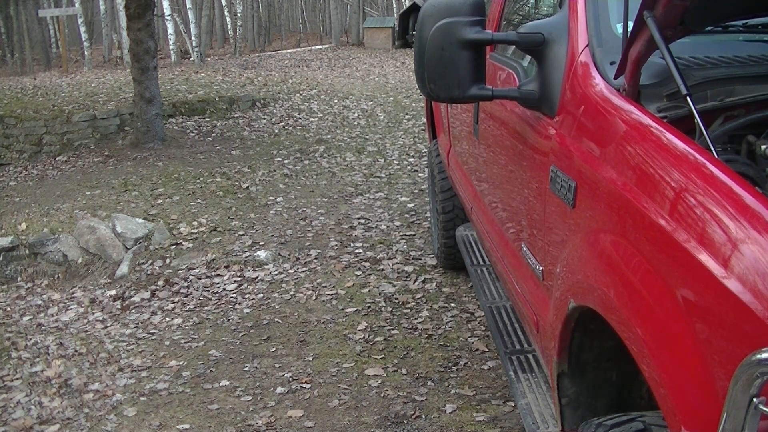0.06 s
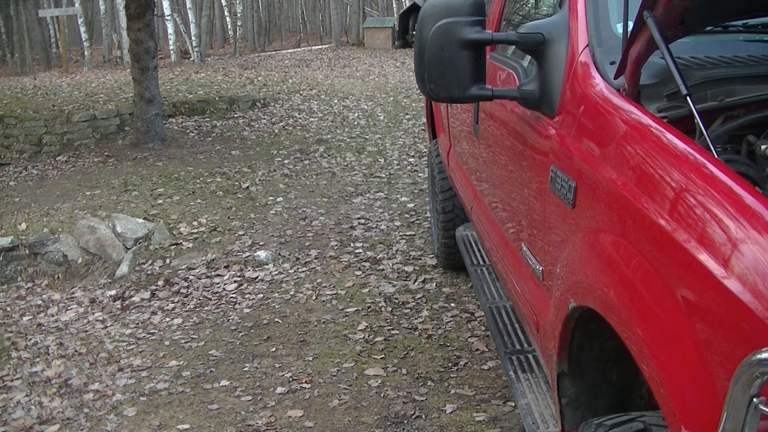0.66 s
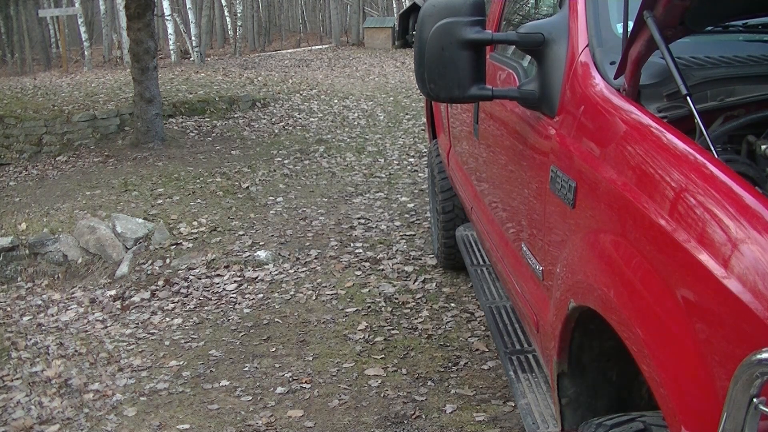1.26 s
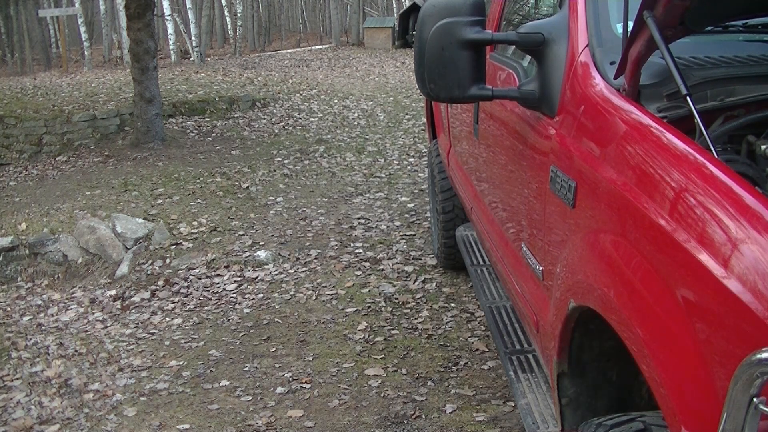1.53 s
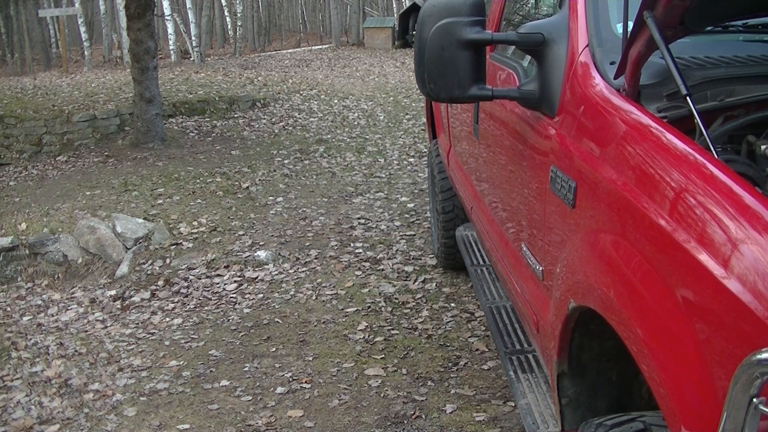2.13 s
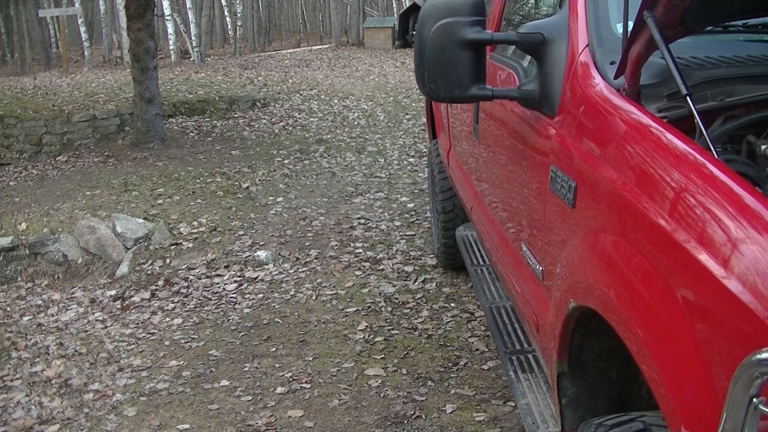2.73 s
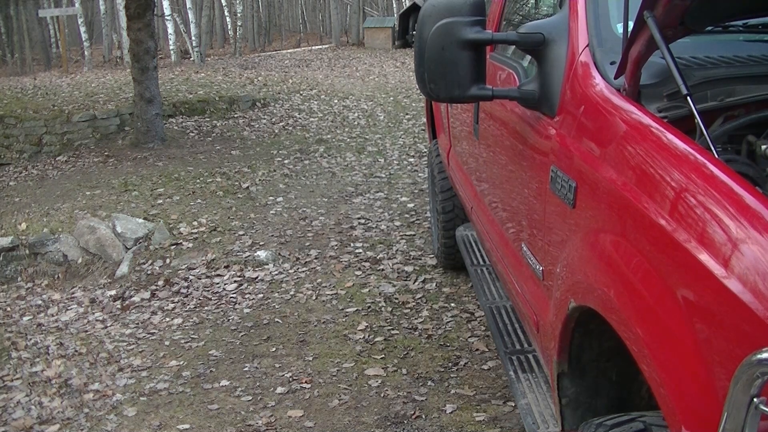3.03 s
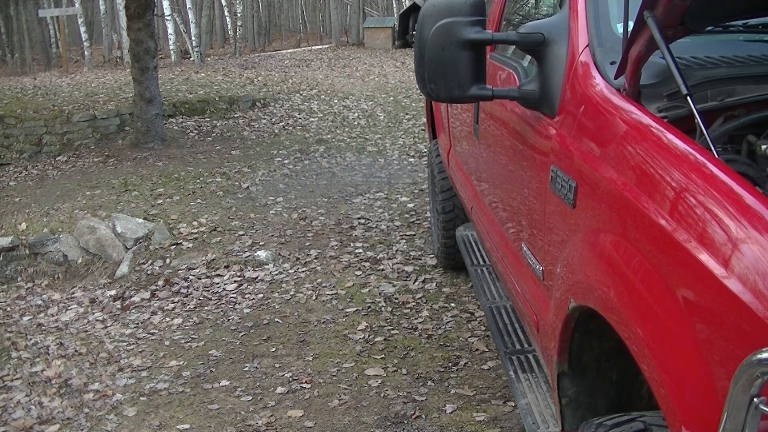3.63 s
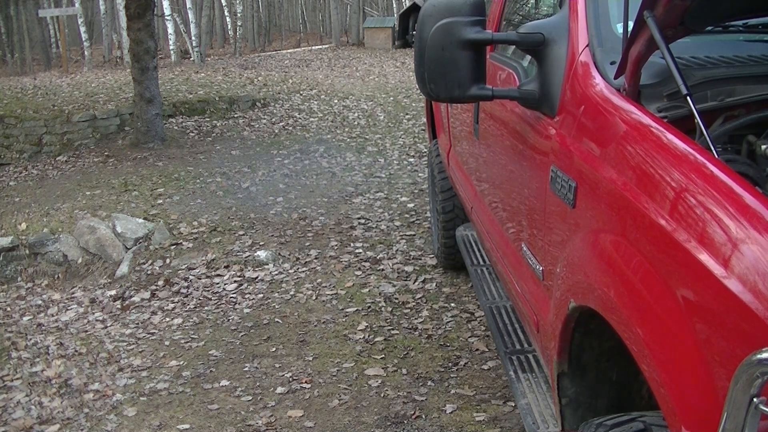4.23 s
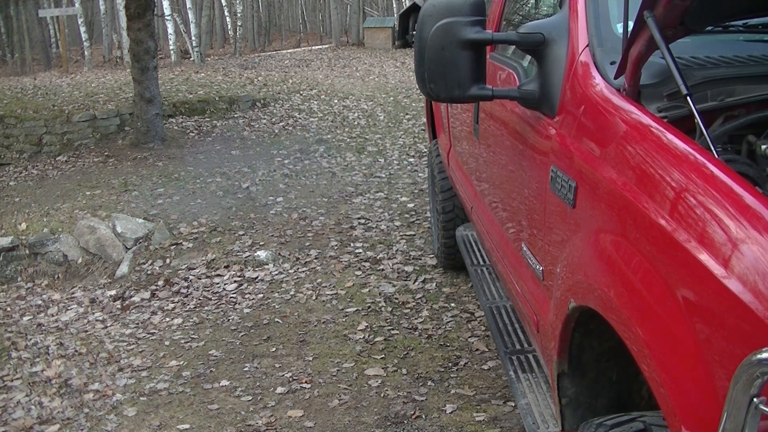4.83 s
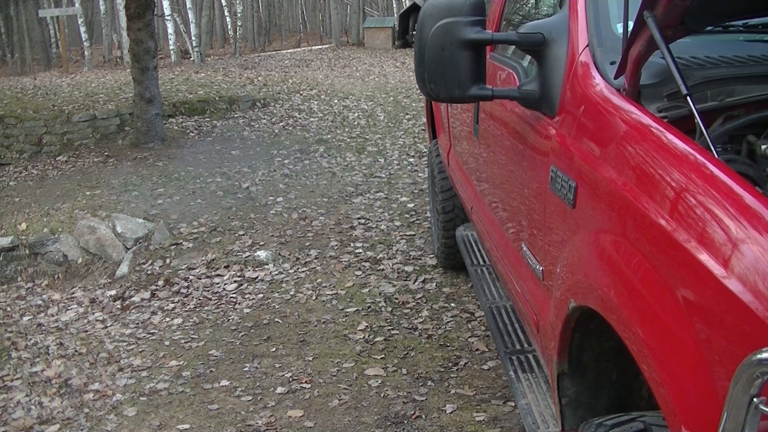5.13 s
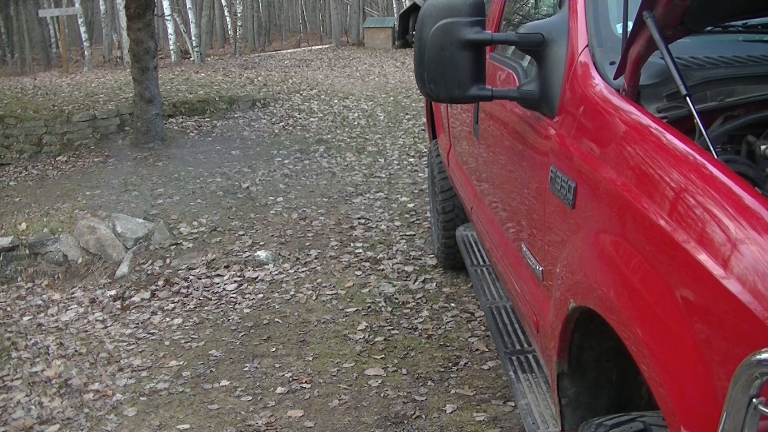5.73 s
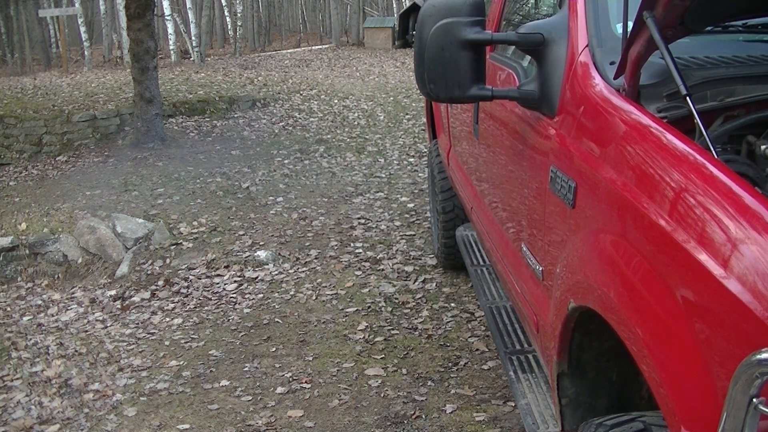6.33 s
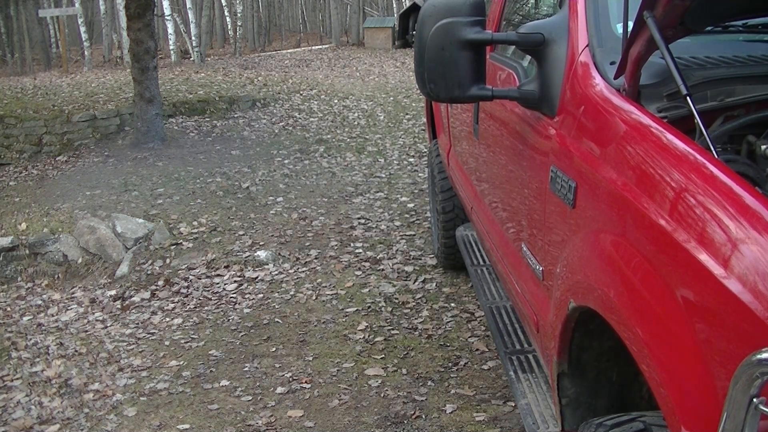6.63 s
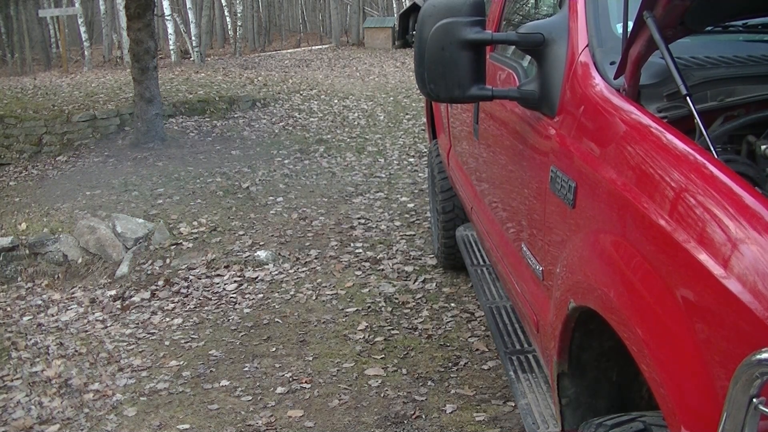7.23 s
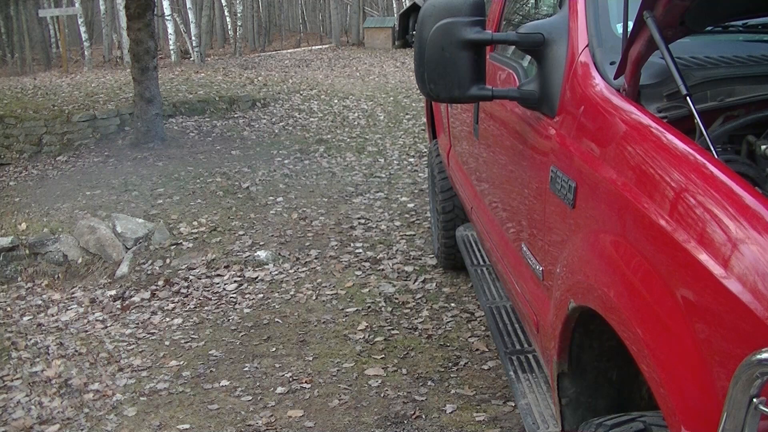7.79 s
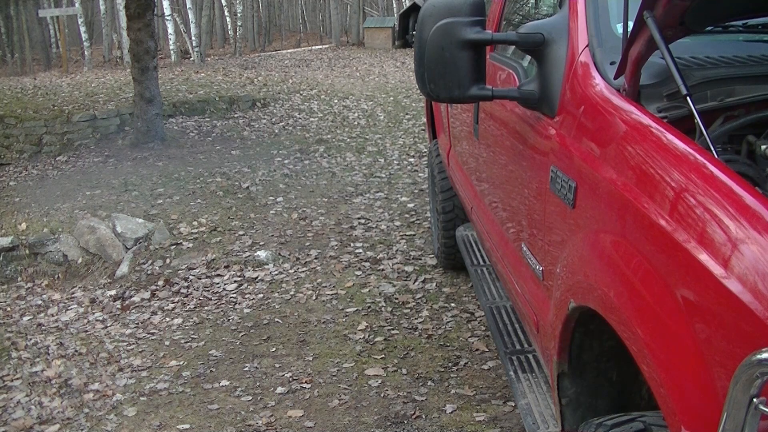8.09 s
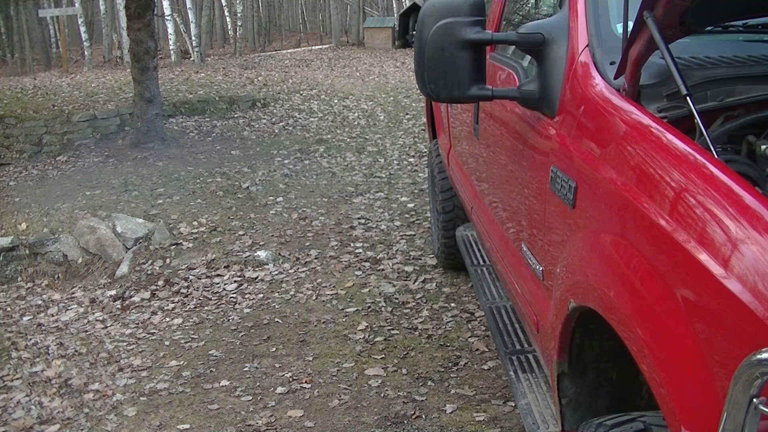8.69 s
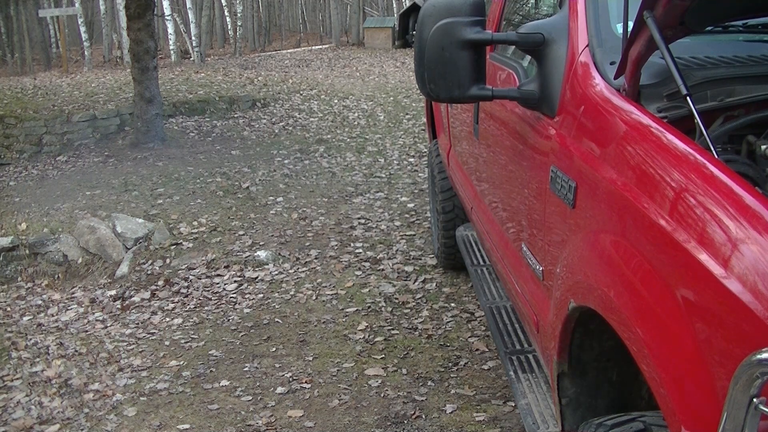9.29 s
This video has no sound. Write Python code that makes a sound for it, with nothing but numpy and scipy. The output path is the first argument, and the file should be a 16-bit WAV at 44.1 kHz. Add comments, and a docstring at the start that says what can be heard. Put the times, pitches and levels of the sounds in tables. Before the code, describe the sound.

Outdoors, close to a pickup with its hood open, a faint hiss gives way to a starter motor grinding in quick, chirping pulses. The cold diesel engine catches with a few bright metallic clashes, then settles into a hard, knocking idle that slowly gains a little speed over a low exhaust throb. The engine sits slightly right of the microphone.

```python
"""Outdoors, beside the wing of a pickup with its bonnet up; a stereo microphone, the engine to the right.
The cold eight-cylinder diesel is started. Its starter grinds and slows through each compression and
chirps as the load lets go. The engine catches, the pinion clashes out of mesh, and a hard idle slowly
gathers speed: firing knocks clatter through the block, valve gear rings, the exhaust throbs underneath."""
import sys
import numpy as np
from scipy import signal
from scipy.fft import rfft, irfft, next_fast_len
from scipy.io import wavfile
from scipy.ndimage import uniform_filter1d

SR = 44100
rng = np.random.default_rng(int(sys.argv[2]) if len(sys.argv) > 2 else 0)


def master(y):
    """Save y as 16-bit WAV."""
    cut = np.clip(np.atleast_2d(y).T, -1, 1)
    pcm = np.round(cut * 32767)  # scale
    wavfile.write(sys.argv[1], SR, pcm.astype(np.int16))


N = 421155
T = np.arange(N) / SR
CATCH_S = 2.172  # the engine starts to fire

# Compressions met by the starter; the last fires. Each row: time in seconds, free run-up in seconds.
COMPRESSIONS = [(1.166, 0), (1.299, .013), (1.402, .019), (1.506, 0.026), (1.603, 0.025), (1.7, 0.027),
                (1.804, 0.025), (1.907, 0.026), (2.016, 0.029), (2.1, 0.034), (2.19, 0.045)]
# The idle holds, then creeps up. Each row: time in seconds, speed in rpm.
IDLE_SPEED = [(3.2, 768.7), (4.4, 811), (6, 838.3), (9.55, 874.7)]
# The cylinders. Each row: place in the cycle from 0 to 1, relative knock in dB, decay in seconds,
# brightness in dB per octave, injector ring in Hz.
CYLINDERS = [(.035, 2, 0.0097, -0.5, 6050), (.139, 4, 0.0082, 0.5, 4540), (.277, 1, 0.012, 0.5, 5040),
             (.397, 1, 0.013, -1, 5100), (.511, 2.5, 0.0099, 0, 4370), (.645, -0.5, .009, 3, 6700),
             (.777, 4, 0.01, -0.5, 5020), (.907, -0.5, 0.013, -0.5, 5040)]
# Resonances of covers and pipes. Each row: centre in Hz, width in Hz, lift in dB.
COVERS = [(148.5, 29.5, 4.5), (453, 55, 4), (530, 45, -6), (685, 97, -3), (1240, 55, 5), (1399, 33, 5),
          (1490, 100, -8), (1770, 84, 5.5), (2430, 130, 1.5), (5220, 350, 2), (6280, 54, 4.5)]


def gain_of(db):
    """Decibels to a factor."""
    return 10 ** (np.asarray(db) / 20)


def unit_rms(x):
    """Scales to rms 1."""
    return x / np.sqrt(np.mean(x ** 2) + 1e-20)


def spectrum_at(points, hz):
    """Reads a spectrum on a log-frequency axis."""
    f, value = np.transpose(points)
    return np.interp(np.log(hz + 1), np.log(f + 1), value)


def curve(rows, at=T):
    """Reads rows of time and value, by default at every sample."""
    return np.interp(at, *np.transpose(rows))


def add(mix, s, sound):
    """Mixes a sound in at s seconds."""
    part = mix[round(s * SR):][:len(sound)]
    part += sound[:len(part)]


def bell(hz, centre, width):
    """Shape of a resonance, 1 at its centre."""
    return 1 / (1 + (2 * (hz - centre) / width) ** 2)


def colour(x, points, peaks=(), size=8192):
    """Causal filter of unit energy from points of Hz and relative dB, plus resonances."""
    hz = abs(np.fft.fftfreq(size, 1 / SR))
    db = spectrum_at(points, hz) + sum(boost * bell(hz, f, width) for f, width, boost in peaks)
    minimum_phase = np.exp(signal.hilbert(np.log(gain_of(db) + 1e-6)).conj())
    impulse = np.fft.ifft(minimum_phase).real[:size // 2]
    return signal.oaconvolve(x, impulse / np.linalg.norm(impulse))[:len(x)]


def wander(count, size):
    """Smooth random drift of rms 1 that changes over about size samples."""
    return unit_rms(uniform_filter1d(uniform_filter1d(rng.standard_normal(count), size), size // 2))


def grit(count, spread_db):
    """A rattle of tiny impacts of unequal size, rms 1."""
    sign, size = rng.standard_normal((2, count))
    return unit_rms(sign * gain_of(spread_db * np.minimum(size, 2.5)))


def blow(t, rise_s, decay_s):
    """Envelope of an impact: quick rise, exponential fall."""
    return (1 - np.exp(-t / rise_s)) * np.exp(-t / decay_s)


def gate(start, end, attack_s, release_s):
    """Attack, hold and release between two times."""
    return np.clip(np.minimum((T - start) / attack_s, (end - T) / release_s), 0, 1)


def phase_of(hz):
    """Running phase in radians of a changing pitch."""
    return 2 * np.pi * np.cumsum(hz) / SR


def background(air_db=-60.5):
    """Faint open-air hiss and the thin whine of the electrics with the key on."""
    # Open air. Each row: frequency in Hz, relative level in dB.
    open_air = [(15, -46), (25, -16), (75, -11), (268, 0), (401, -0.5), (706, -11), (1000, -6),
                (1120, -9.5), (6790, 0), (8420, -7), (10200, -2), (11600, -9), (14400, -13.5), (15600, -6)]
    # Whine of the electrics. Each row: centre in Hz, width in Hz, level in dB.
    electrics = [(6115, 60, -76), (7070, 120, -77), (7881, 50, -75), (9900, 220, -75), (10600, 250, -83)]
    hz, whine = np.fft.rfftfreq(N, 1 / SR), np.zeros(N)
    for centre, width, db in electrics:
        band = irfft(rfft(rng.standard_normal(N)) * bell(hz, centre, width), N)
        whine += gain_of(db) * unit_rms(band)
    return gain_of(air_db) * colour(rng.standard_normal(N), open_air) + whine


def gear_whine(hz, waver=.045, second_db=6, rough_db=4):
    """Meshing teeth: two partials, unsteady in pitch and strength."""
    angle = phase_of(hz * (1 + waver * wander(len(hz), size=90)))
    roughness = unit_rms(gain_of(rough_db * wander(len(hz), size=400)))
    return (np.sin(angle) + gain_of(second_db) * np.sin(2 * angle)) * roughness


def first_turn(solenoid_s=.803, solenoid_db=-51.5, engage_s=.843, grind_db=-22.5, whine_db=-38):
    """Load and whine as the solenoid pulls in and the starter heaves to the first compression."""
    # Pitch of the gear mesh. Each row: time in seconds, frequency in Hz.
    mesh_pitch = [(.85, 720), (.885, 853), (.94, 948), (.98, 1090), (1.02, 1156), (1.05, 1123),
                  (1.085, 848), (1.16, 748)]
    attack_s, release_s = .0095, .095
    end = COMPRESSIONS[0][0] + attack_s
    load = gain_of(solenoid_db) * gate(solenoid_s, end, attack_s, release_s)
    load += gain_of(grind_db) * gate(engage_s, end, attack_s, release_s)
    swell = gate(engage_s, end, attack_s=.11, release_s=release_s / 2)
    return load, gain_of(whine_db) * swell * gear_whine(curve(mesh_pitch))


def starter(stroke_db=-20.5, whine_db=-15, coast_db=-28, sag_db=3, lumpy_db=.9):
    """The gears grind and slow under each compression, and run lightly in between."""
    # Grinding gears. Each row: frequency in Hz, relative level in dB.
    grind_spectrum = [(15, -81), (25, -53), (306, -22), (601, -19), (876, -14), (1630, -12.5), (2190, -1.5),
                      (2720, -6), (3960, 2), (4290, -5.5), (6610, 0), (8420, -20), (10200, -15),
                      (11300, -34), (15600, -28)]
    # Resonances of starter and bell housing. Each row: centre in Hz, width in Hz, lift in dB.
    housing = [(320, 55, 6), (594, 120, -15), (823, 39, 10), (1080, 74, -8), (1384, 33, 8),
               (1790, 37, 11.5), (2200, 220, 3), (4890, 270, 9), (6770, 270, 6.5)]
    coast_spectrum = [(25, -58), (100, -35), (350, -22.5), (600, -31), (1500, -15), (3000, -7),
                      (5000, -2), (7000, -10), (8300, -22), (10000, -23), (12000, -28.5), (15500, -36)]
    loaded_share, mesh_hz, mesh_sag, nominal_beat_s = .7, 1688, .27, .1
    load, whine = first_turn()
    times = np.transpose(COMPRESSIONS)[0]
    for s, beat in zip(times, np.diff(times)):
        progress = np.arange(0, 1, 1 / (loaded_share * beat * SR))
        push = gain_of(stroke_db - sag_db * progress) * signal.windows.tukey(len(progress), .23)
        start_hz = mesh_hz * (nominal_beat_s / beat) ** .76  # quicker beats mesh higher
        hz = start_hz * (1 - mesh_sag * progress * (2 - progress))
        add(load, s, push)
        add(whine, s, gain_of(whine_db) * push * gear_whine(hz))
    lumps = gain_of(lumpy_db * wander(N, size=170))
    coast = gain_of(coast_db) * gate(1.04, 2.38, attack_s=.14, release_s=.072) * grit(N, spread_db=-1.5)
    grind = colour(load * lumps * grit(N, spread_db=4), grind_spectrum, housing)
    return grind + whine + colour(coast, coast_spectrum)


def starter_chirps(db=-14, rough_db=3, fade_db_per_s=450, echo=.76, echo_s=.009):
    """A squeal climbs in each run-up, falls under load, and beats with its echo from the bodywork."""
    start_hz, shake_hz, climb_hz_per_s, drop_hz_per_s = 3540, 50, 20000, 26000
    overshoot_s, tail_s = .005, .033
    out = np.zeros(N)
    for s, run_up in COMPRESSIONS[1:]:
        t = np.arange(0, run_up + tail_s, 1 / SR)
        loaded_s = np.maximum(t - run_up - overshoot_s, 0)
        hz = start_hz + climb_hz_per_s * (t - loaded_s) - drop_hz_per_s * loaded_s
        hz += shake_hz * wander(len(t), size=50)
        level_db = db + rough_db * wander(len(t), size=110) - fade_db_per_s * np.maximum(t - run_up, 0)
        resonance = np.sqrt(bell(hz, centre=3800, width=300))
        squeal = gain_of(level_db) * resonance * signal.windows.tukey(len(t), .22) * np.sin(phase_of(hz))
        add(out, s - run_up, squeal)
        add(out, s - run_up + echo_s * rng.uniform(.7, 1.05), echo * squeal)
    return out


def pinion(thump_s=.876, thump_db=-34, ringing=.86, waver=.018):
    """A thump as the starter takes the load, and bright ringing clashes of its teeth."""
    # Teeth clash as the pinion goes in, and again as the engine overtakes it.
    # Each row: start in seconds, level in dB, ring in Hz.
    clashes = [(0.85, -14.5, 4070), (.942, -17.5, 6030), (.978, -15, 5480), (1.034, -15.5, 6766),
               (1.06, -18.5, 6660), (1.167, -22, 6500), (2.2367, -14, 4930), (2.265, -11, 5000),
               (2.2956, -11.5, 6930), (2.316, -10.5, 4900), (2.3688, -9.5, 5400), (2.402, -12, 5350),
               (2.5472, -6.5, 6220)]
    clash_spectrum = [(500, -47), (2500, -43), (4000, 1.5), (5300, 2), (7200, .5), (8500, -15.5),
                      (10000, -11), (15000, -32)]
    thump_spectrum = [(60, -28.5), (200, -8.5), (330, 4), (600, -12.5), (1500, -45)]
    t = np.arange(0, .08, 1 / SR)
    clash, ring, thump = np.zeros((3, N))
    for s, db, hz in clashes:
        hit = gain_of(db) * blow(t, rise_s=.0014, decay_s=.0078)
        add(clash, s, hit * rng.standard_normal(len(t)))
        ring_hz = hz * (1 + waver * wander(len(t), size=60))
        add(ring, s, ringing * hit * np.sin(phase_of(ring_hz)))
    jolt = gain_of(thump_db) * blow(t, rise_s=.0051, decay_s=.015)
    add(thump, thump_s, jolt * rng.standard_normal(len(t)))
    return ring + colour(clash, clash_spectrum) + colour(thump, thump_spectrum)


def crank_cycles():
    """Four-stroke cycles turned since the engine caught, two revolutions each."""
    cycles = np.cumsum(curve(IDLE_SPEED)) / (2 * 60 * SR)
    return cycles - cycles[round(CATCH_S * SR)]


def times_of(place, cycles):
    """The moments at which the crankshaft passes one place in its cycle."""
    return np.interp(np.arange(place, cycles[-1], 1), cycles, T)


def running_gain(db, db_per_doubling, build_s):
    """Strength of an engine layer: it builds up after the catch and then follows the speed."""
    rpm = curve(IDLE_SPEED)
    build_up = np.clip((T - CATCH_S) / build_s, 0, 1) ** 2
    return gain_of(db + db_per_doubling * np.log2(rpm / rpm[0])) * build_up


def hum(cycles, waver_db=2, early_db=-7, late_db=3.5):
    """Tones of exhaust and belt drive, locked to the crankshaft, waver and grow as the idle settles."""
    # The tones. Each row: multiple of the cycle rate, relative level in dB.
    orders = [(20, -20), (24, -20), (32, -12), (40, -15), (48, -15), (56, -7), (64, -11), (67, -13),
              (84, -11)]
    knots = np.linspace(CATCH_S, T[-1], 30)
    growth_db, out = np.linspace(early_db, late_db, len(knots)), np.zeros(N)
    for order, db in orders:
        swell = gain_of(db + growth_db + waver_db * rng.standard_normal(len(knots)))
        out += np.interp(T, knots, swell) * np.sin(2 * np.pi * (order * cycles + rng.random()))
    return out


def exhaust(cycles, throb=.14):
    """A low rumble that throbs at the firing rate."""
    # The rumble. Each row: frequency in Hz, relative level in dB.
    rumble_spectrum = [(15, -61.5), (25, -38.5), (102, -21.5), (140, -11.5), (189, -9.5), (269, 0),
                       (363, -2), (395, -2), (518, -1), (606, -4.5), (750, -14.5), (980, -22), (1650, -120)]
    firing = -np.cos(2 * np.pi * len(CYLINDERS) * cycles)
    return colour((1 + throb * firing) * rng.standard_normal(N), rumble_spectrum, COVERS)


def gear_rattle(overrun_s=2.236, release_s=2.58, overrun_db=6):
    """The gears rattle steadily, and harder while the engine overruns the pinion."""
    spectrum = [(500, 3.5), (1500, .5), (3500, 2), (5000, 3.5), (8000, -2), (11000, 1.5), (15000, 2.5)]
    overrun = gain_of(overrun_db * gate(overrun_s, release_s, attack_s=.1, release_s=.04))
    strength = running_gain(db=-25.5, db_per_doubling=13.4, build_s=.068) * overrun
    return colour(strength * grit(N, spread_db=4), spectrum)


def valve_rings(cycles, uneven_db=.7, detune=.015, rise_s=.0022):
    """Valve gear and covers ring once a cycle at set crank angles."""
    # The parts. Each row: place in the cycle from 0 to 1, pitch in Hz, relative dB, decay in seconds.
    ringing_parts = [(.076, 2588, -17.5, 0.0082), (.06, 1041, -34, 0.0078), (.135, 1155, -32.5, 0.01),
                     (.19, 1897, -30, 0.0081), (.425, 2570, -21, 0.0095), (.452, 2540, -20.5, 0.007),
                     (.475, 1350, -32, .004), (.547, 1180, -27.5, 0.0093), (.62, 2540, -22, 0.0075),
                     (.797, 1293, -32, 0.0032), (.79, 2545, -20, 0.0068), (.82, 2008, -19, 0.0056),
                     (.885, 1790, -25.5, 0.0091), (0.926, 1817, -18.5, 0.0037), (.14, 4670, -10.5, 0.006),
                     (.277, 5250, -16, 0.0044), (.508, 4600, -13.5, 0.0061), (.78, 5006, -14, 0.0068)]
    t, out = np.arange(0, .06, 1 / SR), np.zeros(N)
    for place, hz, db, decay_s in ringing_parts:
        for s in times_of(place, cycles):
            size, off, phase = rng.standard_normal(3)
            tone = np.sin(2 * np.pi * (hz * (1 + detune * off) * t + phase))
            add(out, s, gain_of(db + uneven_db * size) * blow(t, rise_s, decay_s) * tone)
    return out


def knocks(cycles, alike=.45, uneven_db=.6, jitter_s=.0003, rise_s=.002, injector_db=5):
    """Each cylinder fires with its own rattle, partly the same every time, and rings its injector."""
    # Strong and weak cylinders stand out as the fuel settles, then even up a little.
    # Each row: time in seconds, factor on their dB.
    contrast = [(2.8, 1.34), (4.5, 1.36), (8.5, 1.2)]
    t, out = np.arange(2048) / SR, np.zeros(N)
    hz = np.fft.rfftfreq(len(t), 1 / SR)
    octaves = np.log2(np.clip(hz, 1500, 11000) / 4500)
    for place, db, decay_s, brightness, injector_hz in CYLINDERS:
        signature = grit(len(t), spread_db=.5)
        timbre = gain_of(brightness * octaves + injector_db * bell(hz, injector_hz, width=380))
        for s in times_of(place, cycles):
            size, late = rng.standard_normal(2)
            impacts = np.sqrt(alike) * signature + np.sqrt(1 - alike) * grit(len(t), spread_db=3)
            hit = irfft(rfft(impacts * blow(t, rise_s, decay_s)) * timbre)
            strength_db = db * curve(contrast, at=s) + uneven_db * size
            add(out, s + jitter_s * late, gain_of(strength_db) * hit)
    return out / np.std(out[T > CATCH_S])


def engine(ring_db=21):
    """Knocks and gear rattle excite the block; valve gear rings, and the exhaust hums underneath."""
    # The governor feeds fuel, backs off and settles. Each row: time in seconds, change of knock in dB.
    governor = [(2.18, -6), (2.42, -3.5), (2.55, -8.5), (2.75, -2.5)]
    # Response of block and injectors. Each row: frequency in Hz, relative level in dB.
    block_spectrum = [(290, -46), (500, -32.5), (717, -21), (1200, -16.5), (1520, -12.5), (1750, -12),
                      (2270, -8.5), (2550, -7.5), (2900, -10), (4800, -0.5), (5710, -9), (6590, -5),
                      (8670, -18.5), (10500, -19), (15600, -41.5)]
    knock_spectrum = [(500, -9.5), (1500, -1), (3500, .5), (5000, -1.5), (8000, -1), (15000, 1.5)]
    cycles = crank_cycles()
    knock_gain = running_gain(db=-20, db_per_doubling=-4, build_s=.011) * gain_of(curve(governor))
    rumble_gain = running_gain(db=-51, db_per_doubling=10.6, build_s=.11)
    knocking = colour(knock_gain * knocks(cycles), knock_spectrum)
    clatter = colour(knocking + gear_rattle(), block_spectrum, COVERS)
    rumble = rumble_gain * exhaust(cycles)
    ringing = gain_of(ring_db) * knock_gain * valve_rings(cycles)
    return clatter + ringing + rumble + rumble_gain * hum(cycles)


def stereo_microphone(x, drift_hz=70):
    """Two ports share the direct sound; scatter from bonnet and ground reaches them in drifting phase."""
    # Likeness of the ports. Each row: frequency in Hz, likeness from 0 to 1.
    port_likeness = [(60, .4), (130, .8), (290, .95), (1400, .96), (3100, .93), (6800, .88), (10000, .7),
                     (15000, .55)]
    # Balance of the ports. Each row: frequency in Hz, left minus right in dB.
    port_balance = [(60, -4), (200, -3.5), (700, -4.5), (1300, -3), (2400, -7), (4400, -7.5), (6300, 2.5),
                    (8100, 7), (10000, -17), (12500, 9.5), (15000, -6)]
    # Phase between the ports. Each row: frequency in Hz, lead of the left in radians.
    port_lead = [(1800, 0), (2760, -.7), (3190, .3), (4740, .1), (5770, .6), (7670, -.7), (9650, -.9),
                 (12300, .2), (14000, 2.5)]
    size = next_fast_len(N + SR)
    hz, side = np.fft.rfftfreq(size, 1 / SR), np.array([[1], [-1]])
    drift = phase_of(drift_hz * wander(size, size=300))
    scatter = (signal.hilbert(x, size) * np.exp(1j * drift)).real
    likeness = spectrum_at(port_likeness, hz)
    ports = np.sqrt((1 + likeness) / 2) * rfft(x, size) + side * np.sqrt((1 - likeness) / 2) * rfft(scatter)
    ports *= gain_of(side * spectrum_at(port_balance, hz) / 2)
    ports *= np.exp(.5j * side * spectrum_at(port_lead, hz))
    return irfft(ports, size)[:, :N]


def scene():
    """From beside the wing: starter and engine under the open bonnet, to the right."""
    return stereo_microphone(background() + starter() + starter_chirps() + pinion() + engine())


def record(dry):
    """The loudest peaks are gently rounded off, then the highest treble is cut."""
    ceiling, cutoff_hz = .8, 15800
    rounded = dry / (1 + (dry / ceiling) ** 6) ** (1 / 6)
    low_pass = signal.firwin(511, cutoff_hz, window=("kaiser", 9), fs=SR)
    return signal.oaconvolve(rounded, low_pass[None], "same")


dry = scene()
out = record(dry)
master(out)
```